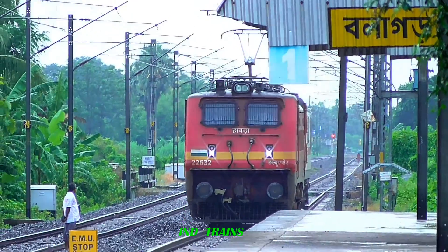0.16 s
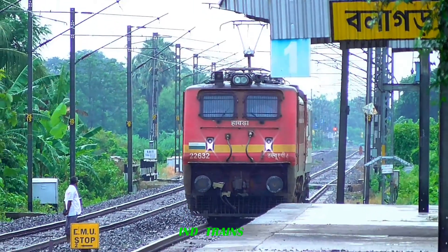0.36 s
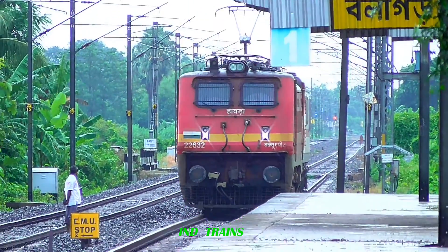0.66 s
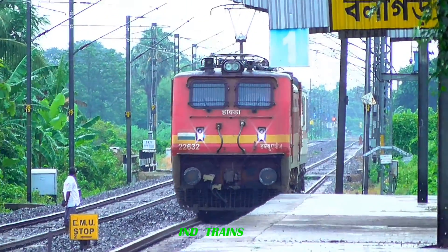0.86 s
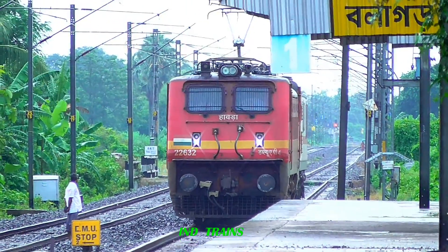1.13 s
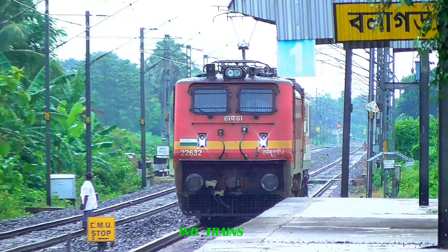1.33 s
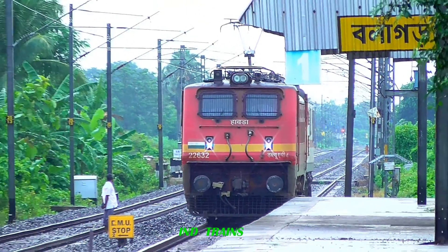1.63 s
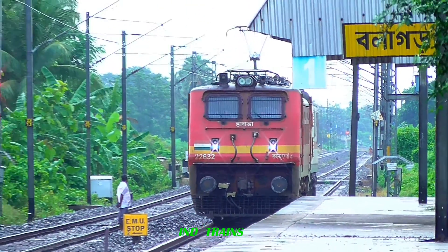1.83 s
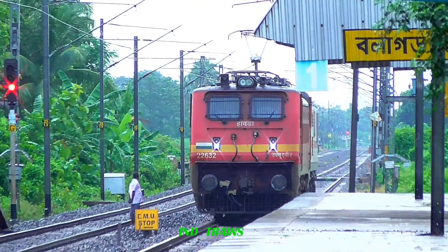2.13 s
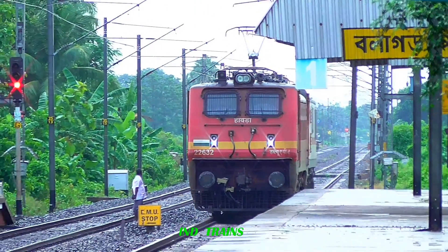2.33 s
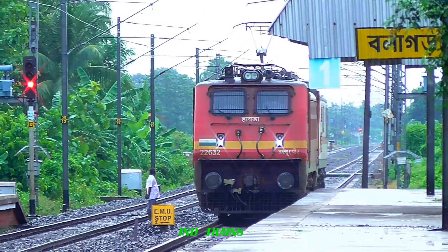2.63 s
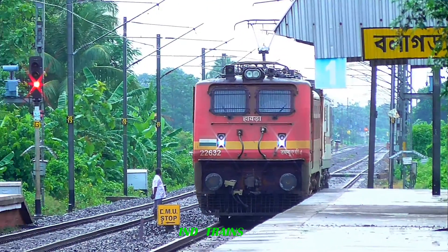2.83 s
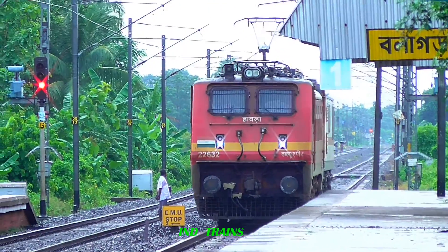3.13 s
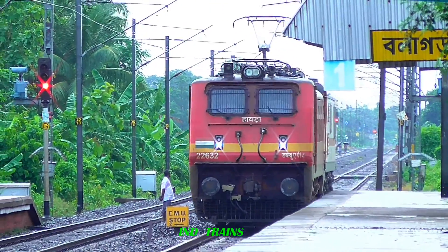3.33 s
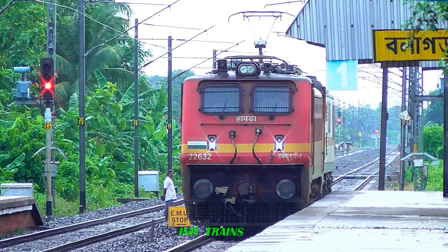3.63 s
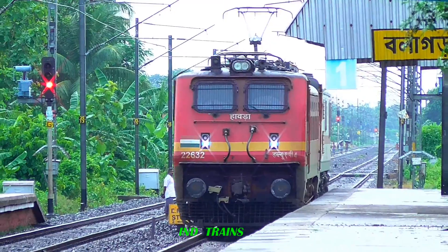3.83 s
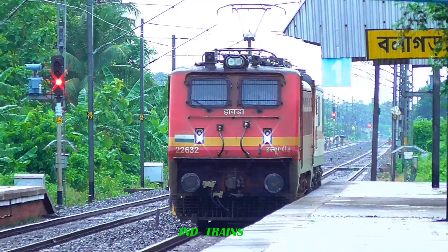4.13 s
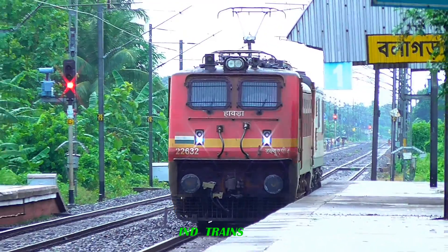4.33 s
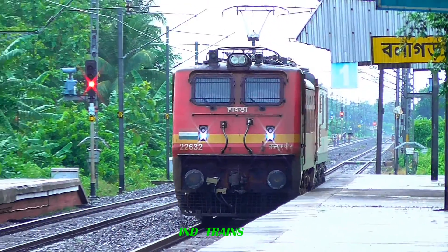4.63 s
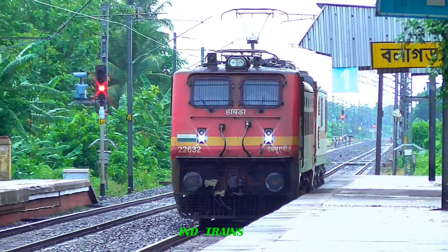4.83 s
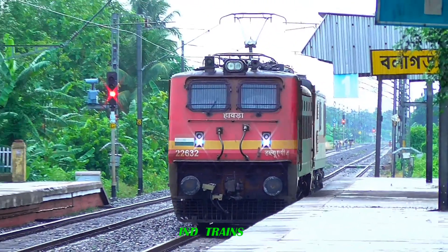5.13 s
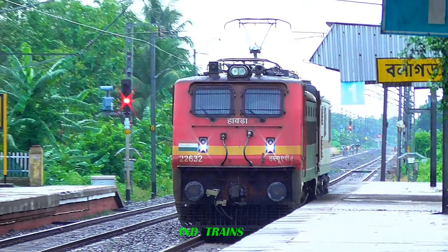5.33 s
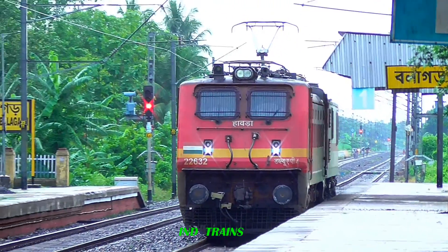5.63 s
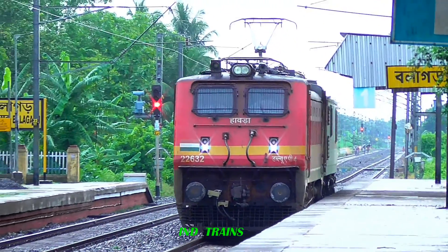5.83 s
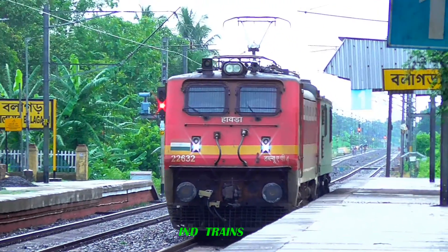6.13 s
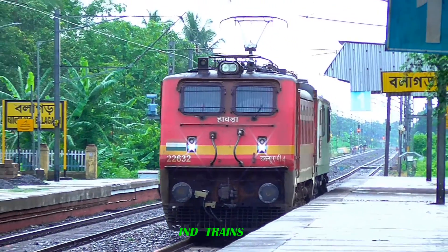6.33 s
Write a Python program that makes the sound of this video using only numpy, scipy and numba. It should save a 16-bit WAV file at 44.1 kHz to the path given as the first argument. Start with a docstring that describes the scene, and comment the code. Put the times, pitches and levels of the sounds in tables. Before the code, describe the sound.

An electric locomotive approaches a country platform, heard from straight ahead over a low outdoor murmur. From about 0.5 to 1.7 seconds its high, steady air horn sounds in the distance, sags slightly as it stops and echoes briefly off the trees. The rumble and roar of wheels on rails grow gradually throughout. A throbbing gear whine, creeping up in pitch, becomes prominent from about 3.5 seconds, and a high hiss swells with it. At 5.3 seconds a wheel knocks once on a rail joint, a dull thud with a light clink. Drops tick and snap irregularly nearby, and small birds give faint, thin chirps near the start, around 3 to 4 seconds and at 5. At 5.9 seconds the horn sounds again, close and far louder, pushing everything else down and holding until the end at about 6.5 seconds.

```python
"""The high air horn of an electric locomotive sounds twice, first far off, then close, as the train nears
a country platform. A diaphragm chops the air into a harmonic series, and the trees reflect it.
Rough wheels roar on the rails and knock once at a joint; the traction gears whine and throb.
Drops tick nearby and small birds chirp over a high hiss and the murmur of the countryside.
An automatic gain control turns everything down under the close blast."""
import sys
import numpy as np
from scipy import signal
from scipy.fft import rfft, irfft, next_fast_len
from scipy.io import wavfile
from scipy.ndimage import map_coordinates
from numba import njit

SR = 44100
rng = np.random.default_rng(int(sys.argv[2]) if len(sys.argv) > 2 else 0)


def bounce(signal):
    """Save signal as a 16-bit WAV file at the path given by the first command-line argument."""
    frames = np.transpose(np.atleast_2d(signal))
    limited = np.clip(frames, -1, 1)
    pcm = np.round(limited * 32767).astype(np.int16)
    wavfile.write(sys.argv[1], SR, pcm)


N = 285768
T = np.arange(N) / SR
OPEN_S, SHUT_S = 0.015, 0.038  # horn valve: rise time, decay time constant


def horn(blast, partials, sharp_hz=4.8, settle_s=.25, droop_hz=6, bloom_s=0.033):
    """Periodic flow: a diaphragm chops air into harmonics; turbulence on the way makes them flutter."""
    # swell and fade of the fundamental on its way through the air: (time [s], level [dB])
    swell = [(.5, -2.5), (.66, 0), (.73, -1.5), (.8, 2.5), (.95, 0), (1.44, -2), (1.51, 3), (1.68, 0),
             (5.9, -3.5), (6.15, 0.5), (6.48, 1)]
    # mellowing as the pressure sinks: (harmonic number, fade rate [dB/s])
    mellowing = [(2, 5.5), (3, 7.5), (4, 16), (5, 7), (6, 1), (8, 3), (11, 3.5), (20, 3.5)]
    # air rushing through the horn: (frequency [Hz], spectral level [dB])
    rush_spectrum = [(40, -35), (300, -15), (680, -8), (780, -2), (950, -12), (1500, -9), (1800, -28),
                     (2400, -17), (4200, -19), (5300, -32), (7000, -36), (9000, -28), (12000, -34),
                     (15000, -54)]
    start, stop, settled_hz, level_db, held_db, side_db, rush_db = blast
    pressure = gate(start, stop, OPEN_S, SHUT_S)
    age = np.clip(T - start, 0, stop - start)
    past_middle = age - (stop - start) / 2
    # the note starts sharp, settles, then drops as the air bleeds away
    hz = settled_hz + sharp_hz * np.exp(-age / settle_s) - droop_hz * (1 - pressure) * (T > stop)
    phase = phase_of(hz * (1 + 0.00058 * walk(55)))
    note = 0
    for k, (_, db) in enumerate(partials, 1):
        fade_db = np.interp(k, *np.transpose(mellowing)) * past_middle
        if k == 1:
            shape_db = curve(swell)
        elif k <= 5:  # low overtones bloom late
            shape_db = -fade_db - held_db * np.exp(-age / bloom_s)
        else:  # the brassy top speaks at once
            shape_db = 0.5 - fade_db
        flutter_db = 0.2372 * min(k, 8) * (walk(25) + 1.5 * walk(5))
        bite = pressure ** (min(k, 3) / 2 - .5)  # overtones need full pressure
        note += bite * undb(db + shape_db + flutter_db) * np.sin(k * phase + 0.02 * k * walk(50))
    # a weak, unsteady side tone lies a whole step below the note
    side_phase = phase_of(hz * .891 + 3 * walk(16))
    side = undb(2 * walk(8)) * (np.sin(side_phase) + 0.69 * np.sin(2 * side_phase))
    rush = undb(rush_db) * noise(rush_spectrum)
    return undb(level_db) * pressure * (np.sqrt(2) * (note + undb(side_db) * side) + rush)


def horn_sag(start=1.58, length_s=0.16, from_hz=765, to_hz=720, db=-30.5):
    """Pitch follows pressure: as the air drains, a faint tone glides flat and dies."""
    progress = np.clip((T - start) / length_s, 0, 1)
    return undb(db) * np.sin(np.pi * progress) * np.sin(phase_of(from_hz + (to_hz - from_hz) * progress))


def horn_blasts():
    """Superposition of two blasts and their echoes, which are turned down while the horn sounds."""
    # far blast, then near: (valve opens [s], valve shuts [s], settled pitch [Hz], level [dB],
    # initial cut of low overtones [dB], relative side tone [dB], relative air rush [dB])
    blasts = [(0.482, 1.674, 775.7, -23, 12.5, -26, -22.5), (5.89, 6.6, 777.2, -2.5, 9, -27.5, -27)]
    # horn spectrum from afar: (harmonic number, relative level [dB])
    far_partials = [(1, 1), (2, 0), (3, -12), (4, -27.5), (5, -36), (6, -43), (7, -55), (8, -47), (9, -46),
                    (10, -46), (11, -36.5), (12, -39.5), (13, -45), (14, -43), (15, -52), (16, -55),
                    (17, -58), (18, -58), (19, -58), (20, -61)]
    # horn spectrum close by: (harmonic number, relative level [dB])
    near_partials = [(1, 2), (2, -5.5), (3, -17), (4, -33), (5, -35), (6, -47), (7, -57), (8, -47),
                     (9, -51.5), (10, -47), (11, -39.5), (12, -41), (13, -39.5), (14, -42), (15, -49),
                     (16, -50), (17, -53), (18, -57), (19, -61), (20, -69)]
    far, near = horn(blasts[0], far_partials), horn(blasts[1], near_partials)
    echo_gain = 1 - .8 * sum(gate(start, stop, OPEN_S, SHUT_S) for start, stop, *_ in blasts)
    return far + near + horn_sag() + echo_gain * tree_echoes(far + undb(-20.5) * near)


def tree_echoes(sound, first_s=.04, last_s=.6, fade_db_per_s=32.5, sway=0.56, count=20):
    """Reflection from trees: later echoes are fainter; swaying leaves modulate them and absorb treble."""
    echoes = np.zeros(N)
    for delay in np.linspace(first_s, last_s, count) + .02 * rng.random(count):
        db = -15 - fade_db_per_s * (delay - first_s)
        add(echoes, delay, undb(db) * sound * (1 + sway * walk(11)))
    return colour(echoes, [(800, 0), (1600, -4.5), (3000, -9)])


def wheels(start_distance_m=122, speed_m_s=15.25):
    """Roughness excitation: sleepers rumble and rails roar, louder as the distance shrinks."""
    # rolling noise: (frequency [Hz], spectral level [dB])
    roll_spectrum = [(15, -58.5), (40, -39), (80, -8), (130, -19.5), (250, -7), (420, 1), (650, -3),
                     (900, 0.5), (1150, 2), (1400, 1.5), (1550, -10), (1750, -18), (2400, -14.5),
                     (3200, -26), (6000, -42), (16000, -75)]
    nearness = start_distance_m / (start_distance_m - speed_m_s * T)
    roll = noise(roll_spectrum)
    low = colour(roll, [(550, 6), (850, -5)])
    rumble = low * nearness ** 1.069 * undb(-40.5 + 0.4 * walk(15))
    roar = (roll - low) * nearness ** 1.146 * undb(-40.5 + walk(25))
    return rumble + roar


def gears(mesh_hz=1083.5, rise_hz_per_s=9.15, shaft_hz=32.56, roughness=0.25):
    """Amplitude modulation: each shaft turn swells the rising whine of meshing teeth, adding sidebands."""
    # gear whine: (time [s], level [dB])
    whine_levels = [(0, -51), (1.2, -43.5), (2.0, -47.5), (2.25, -41), (2.8, -38.5), (3.38, -44),
                    (3.5, -31.5), (3.85, -28.5), (4.1, -35), (4.28, -26.5), (4.47, -32.5), (4.65, -28),
                    (5.1, -28), (5.35, -31), (6.48, -29.5)]
    # throb, as the upper sideband relative to the mesh tone: (time [s], level [dB])
    throb_levels = [(0, -3.5), (3.5, -4), (4.3, -16.5), (5.2, -14.5), (6.48, 2)]
    mesh = phase_of(mesh_hz + rise_hz_per_s * T + 1.32 * walk(9.8))
    shaft = phase_of(shaft_hz + 1.43 * walk(6.2))
    sidebands = undb(curve(throb_levels)) * np.sin(mesh + shaft) + 0.13 * np.sin(mesh - shaft)
    uneven_teeth = roughness * (walk(45) * np.sin(mesh) + walk(45) * np.cos(mesh))
    return unit(np.sin(mesh) + sidebands + uneven_teeth) * undb(curve(whine_levels) + walk(13))


def rail_joint(start=5.326, db=-30):
    """Impact excitation: one wheel strikes a joint, giving a dull thud with a light clink on top."""
    ring = noise([(40, -29), (300, 3.5), (1200, -3), (1900, -11), (3000, -15), (3900, -0.5),
                  (5200, -30), (12000, -50)])
    return ring * gate(start, start + 0.013, rise_s=0.0026, fall_s=0.032) * undb(db)


def drops_and_clicks(faint_count=1100):
    """Brief impacts are broadband: drops splash and tap, among a click, sharp snaps and a soft hiss."""
    # near drops and, at 0.491 s, a short click as the far horn starts:
    # (time [s], level [dB], tap relative to splash [dB]), before offsets and filtering
    ticks = [(0.1654, -36, 1), (0.491, -32, -4), (0.8125, -25.5, -10), (1.1267, -25, -9),
             (1.382, -26.5, -11), (2.104, -32, -2), (2.2123, -18.5, -11.5), (2.374, -26, -23),
             (2.4633, -29, -12), (3.1356, -27, 1), (3.295, -32, -2), (3.343, -32.5, -6), (3.694, -24, -21),
             (3.8612, -24.5, -20), (4.069, -23, -12), (4.2665, -26, -20), (4.8373, -33, -3)]
    # sharp snaps: (time [s], level before filtering [dB], time to decay by 60 dB [s])
    snaps = [(0.226, -11.5, 0.018), (2.409, -22, 0.028), (3.138, -21, 0.021), (3.747, -13, 0.011)]
    # splash of a drop: (frequency [Hz], gain [dB])
    splash_filter = [(1000, -41), (2500, -21), (5000, -4), (6500, -6), (8000, 5.5), (10000, 4),
                     (13000, -6.5), (16000, -28)]
    # tap of the surface it lands on: (frequency [Hz], gain [dB])
    tap_filter = [(1200, -27), (2600, -25), (4000, 0.5), (5200, -13.5), (7000, -27), (16000, -43)]
    # hiss of the wet air: (frequency [Hz], spectral level [dB])
    air_spectrum = [(100, -30), (2000, -12), (5000, -8), (6600, -10), (7700, -1), (10000, 0), (12000, -6),
                    (14000, -15), (16000, -25)]
    splash, tap, snap = np.zeros((3, N))
    for start, db, tap_db in ticks:
        add(splash, start, undb(db + 3.5) * burst(0.0058))
        add(tap, start, undb(db + tap_db + 16.5) * burst(0.021))
    for start, db, t60 in snaps:
        add(snap, start, undb(db) * burst(t60))
    for when, size, hardness in rng.random((faint_count, 3)):
        drop = undb(-46 + 15 * size ** 5) * burst(0.011)  # loud ones are rare
        add(splash, when * N / SR, drop)
        add(tap, when * N / SR, undb(-2) * hardness * drop)
    snap = colour(snap, [(300, -40), (1200, -20), (2300, -5.5), (3700, 7), (4500, 1.5), (5500, -22),
                         (7000, -14), (14000, -31)])
    hiss = noise(air_spectrum) * undb(-60 + .8 * walk(6))
    return colour(splash, splash_filter) + colour(tap, tap_filter) + snap + hiss


def birds(waver_depth=0.01):
    """Frequency glides make thin chirps; fast random modulation of pitch and level roughens them."""
    # chirps: (time [s], duration [s], start pitch [Hz], end pitch [Hz], relative level [dB])
    chirps = [(.04, .07, 3450, 3200, -51), (.33, .045, 3300, 4200, -51), (.552, .022, 3900, 2700, -43),
              (2.86, .07, 4400, 4850, -52), (3.0, .085, 3650, 2900, -45), (3.175, .025, 3900, 4050, -42),
              (3.195, .025, 4300, 2700, -41), (3.81, .035, 3900, 3500, -48), (5.01, .035, 3900, 3550, -42)]
    song, tremble = np.zeros(N), walk(290)
    for start, length_s, from_hz, to_hz, db in chirps:
        progress = np.linspace(0, 1, int(length_s * SR))
        glide_hz = from_hz + (to_hz - from_hz) * progress
        waver = 1 + waver_depth * np.roll(tremble, -int(start * SR))[:len(progress)]
        envelope = np.sqrt(np.abs(np.sin(np.pi * progress)))
        add(song, start, undb(db) * envelope * np.sin(phase_of(glide_hz * waver)))
    return song * undb(2.5 * walk(120) + 1)


def high_hiss():
    """Modulated noise: a hiss near 3.5 kHz swells and fades, probably distant birds or insects."""
    # high hiss: (frequency [Hz], spectral level [dB])
    hiss_spectrum = [(1500, -3), (2400, -9), (3400, 5), (4200, -0.5), (5000, -10), (6300, -31), (8000, -23),
                     (16000, -48)]
    # its swells: (time [s], level [dB])
    hiss_levels = [(0, -52), (.6, -50), (1.4, -52.5), (2.1, -51), (2.9, -46), (3.7, -49), (4.25, -45.5),
                   (4.65, -48.5), (5.3, -44), (5.8, -42.5), (6.48, -41.5)]
    return noise(hiss_spectrum) * undb(curve(hiss_levels) + walk(16))


def countryside(db=-47.5):
    """Stationary noise: a low, steady murmur lies under everything."""
    # murmur: (frequency [Hz], spectral level [dB])
    murmur_spectrum = [(15, -46), (40, -27), (85, -5), (110, -5.5), (140, 1), (190, -3.5), (250, 4.5),
                       (400, -5), (800, -9), (3000, -47), (16000, -83)]
    return noise(murmur_spectrum) * undb(db)


def undb(db):
    """Decibels to amplitude ratio."""
    return 10 ** (np.asarray(db) / 20)


def unit(x):
    """Normalisation to rms 1."""
    return x / np.sqrt(np.mean(x ** 2))


def curve(table):
    """Linear interpolation of (time [s], level [dB]) points at every sample."""
    return np.interp(T, *np.transpose(table))


def colour(x, points):
    """Spectral shaping by (frequency [Hz], gain [dB]) points."""
    hz, db = np.transpose(points)
    size = next_fast_len(N + SR // 4)
    bins = np.maximum(np.fft.rfftfreq(size, 1 / SR), 1)
    gain = undb(np.interp(np.log(bins), np.log(hz), db))
    return irfft(rfft(x, size) * gain, size)[:N]


def noise(points):
    """Filtered white noise of rms 1."""
    return unit(colour(rng.standard_normal(N), points))


def walk(rate_hz):
    """Smooth random fluctuation with spread near 1 and bandwidth near rate_hz."""
    knots = rng.standard_normal(2 ** 13)
    coarse = T[::8]
    smooth = map_coordinates(knots, [2 * rate_hz * coarse], order=2, mode="mirror")
    return np.interp(T, coarse, 1.1 * smooth)


def phase_of(hz):
    """Phase [rad] as the integral of frequency."""
    return 2 * np.pi * np.cumsum(hz) / SR


def add(track, start, sound):
    """Superposition of a sound on a track from start [s]."""
    i = int(np.clip(start * SR, 0, N - 1))
    track[i:i + len(sound)] += sound[:N - i]


def burst(t60):
    """Exponential decay: a crack of noise falls 60 dB in t60 [s], which also sets its energy."""
    decay = np.exp(-np.log(1000) * T[:SR // 8] / t60)
    crack = rng.standard_normal(len(decay)) * decay
    return crack * np.linalg.norm(decay) / np.linalg.norm(crack) / 2


def gate(start, stop, rise_s, fall_s):
    """Envelope with a linear rise from start and an exponential decay from stop."""
    return np.clip((T - start) / rise_s, 0, 1) * np.exp(-np.maximum(T - stop, 0) / fall_s)


@njit
def follow(x, attack, release):
    """Envelope detection: one-pole smoothing with separate rates for rise and fall."""
    out, level = np.empty(len(x)), 0.
    for i in range(len(x)):
        level += (x[i] - level) * (attack if x[i] > level else release)
        out[i] = level
    return out


def scene():
    """Mid-side stereo: all sources lie ahead; only a trace of scattered sound differs between the ears."""
    mid = horn_blasts() + gears() + wheels() + high_hiss() + rail_joint()
    mid += drops_and_clicks() + birds() + countryside()
    scattered = np.zeros(N)
    add(scattered, .01, mid * walk(20))
    side = undb(-27.5) * colour(scattered, [(60, -4), (250, -33), (700, 6.5), (1100, 6), (2200, -18),
                                            (4200, 3), (8000, 6.5)])
    return np.array([mid + side, mid - side])


def record(dry, threshold=0.74, attack_s=0.0012, release_s=0.39, look_ahead_s=.004, cutoff_hz=15700):
    """Automatic gain control ducks the whole mix under the close horn; a low-pass cuts the top."""
    envelope = follow(np.abs(dry).mean(axis=0), 1 / (attack_s * SR), 1 / (release_s * SR))
    ahead = np.interp(T + look_ahead_s, T, envelope)
    held = dry * threshold / np.maximum(ahead, threshold)
    return signal.sosfilt(signal.ellip(10, .1, 90, cutoff_hz, fs=SR, output="sos"), held)


dry = scene()
out = record(dry)
bounce(out)
```